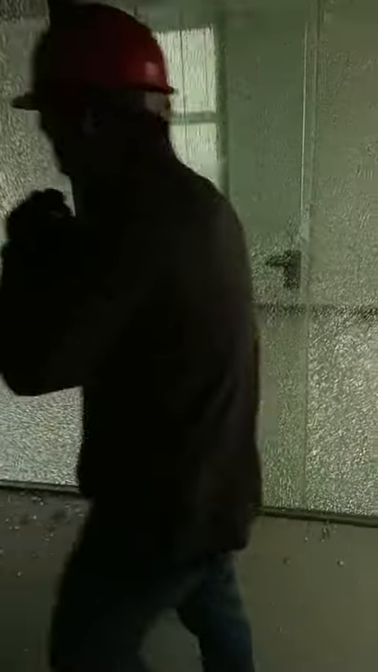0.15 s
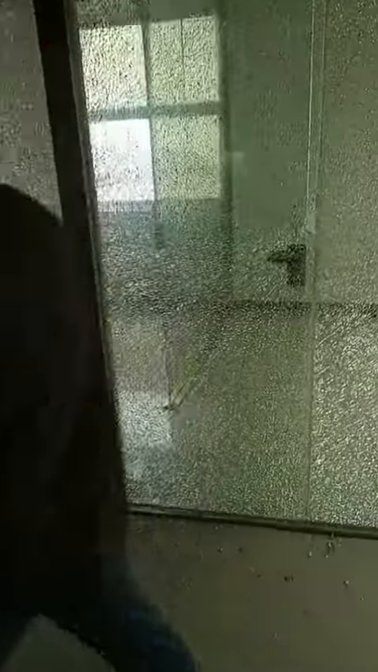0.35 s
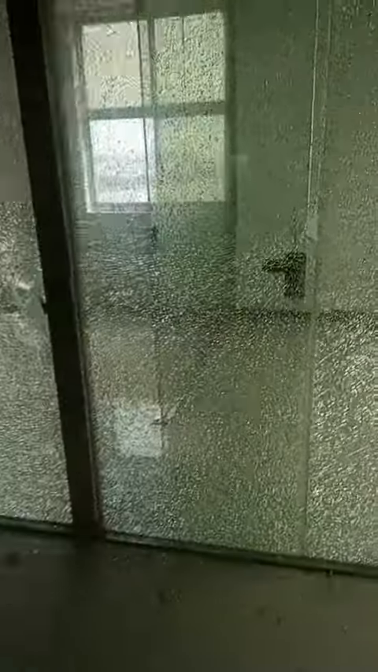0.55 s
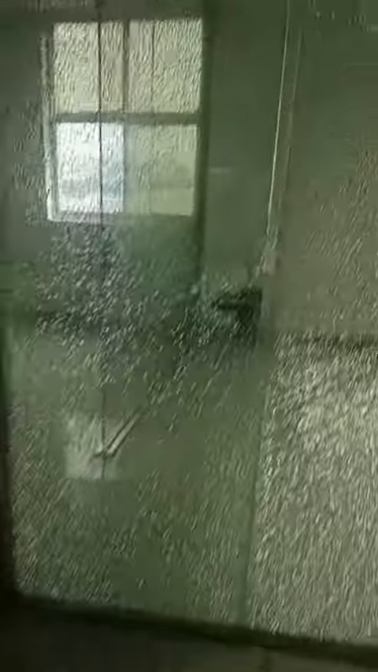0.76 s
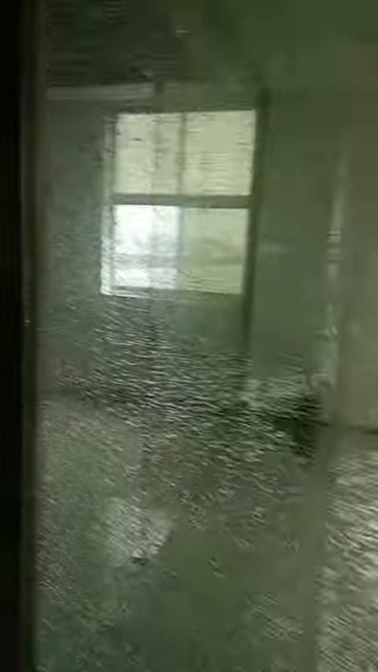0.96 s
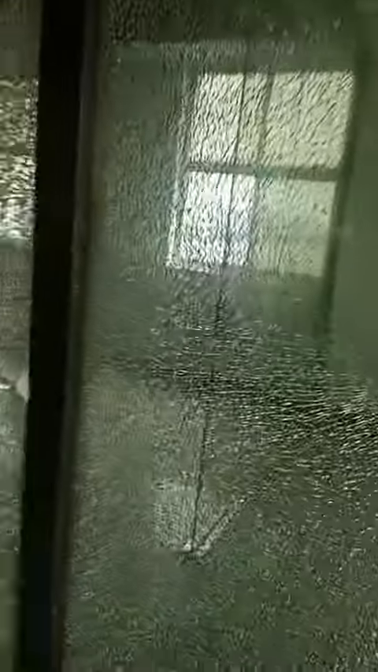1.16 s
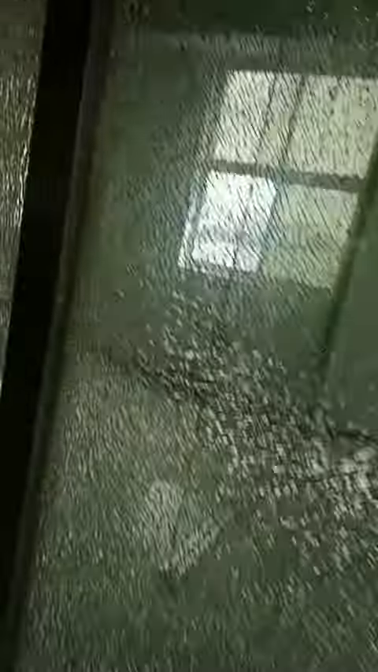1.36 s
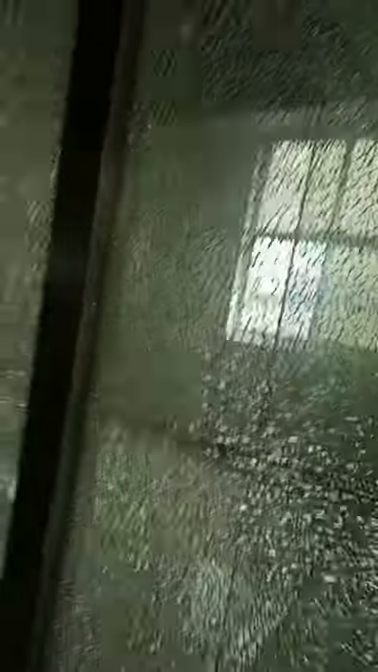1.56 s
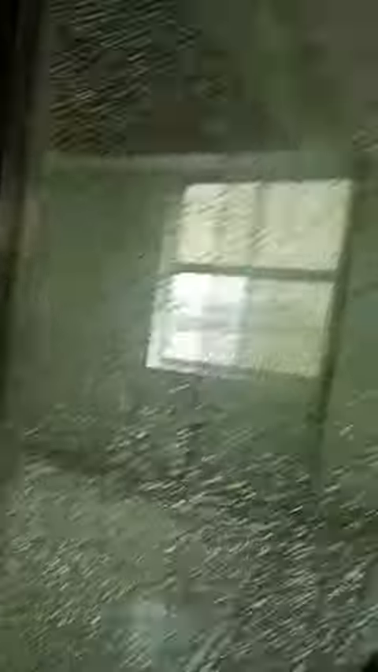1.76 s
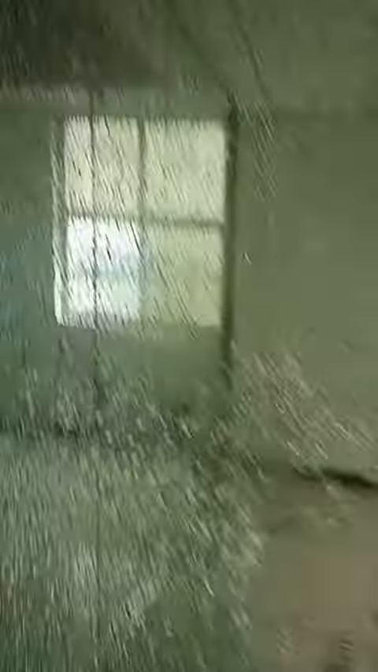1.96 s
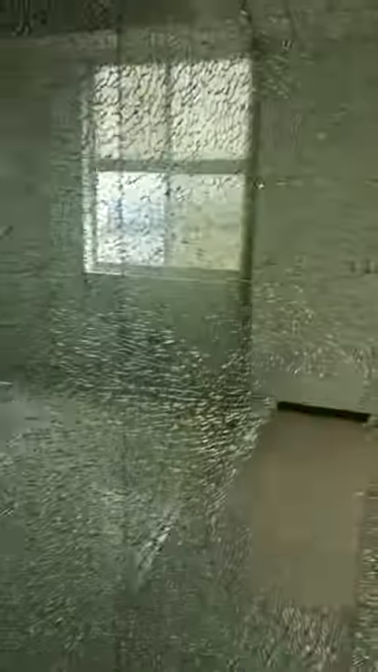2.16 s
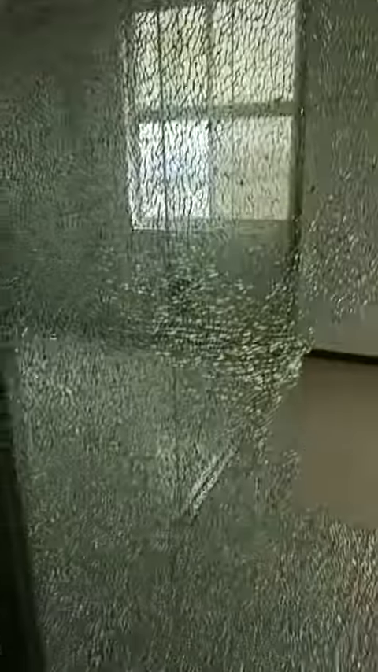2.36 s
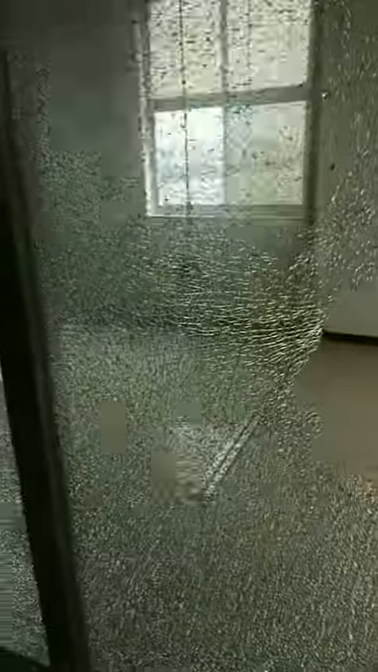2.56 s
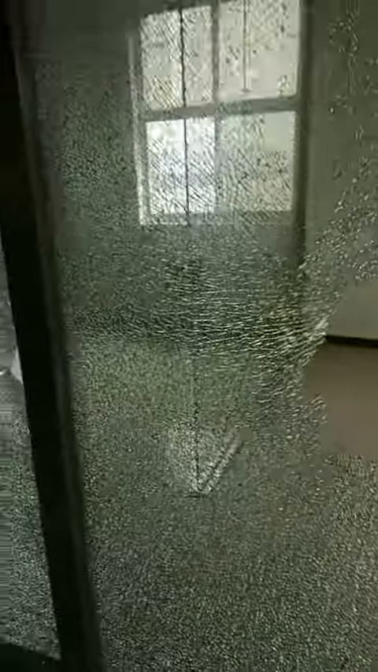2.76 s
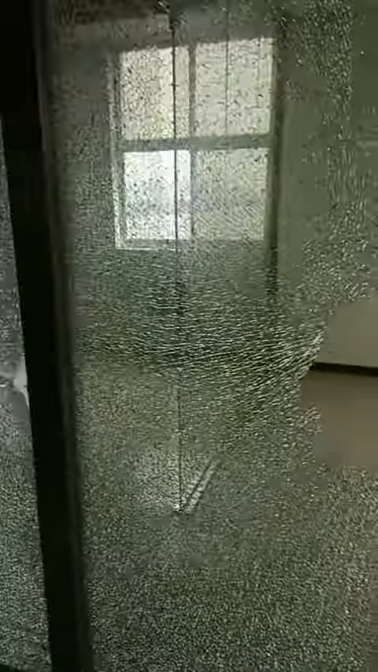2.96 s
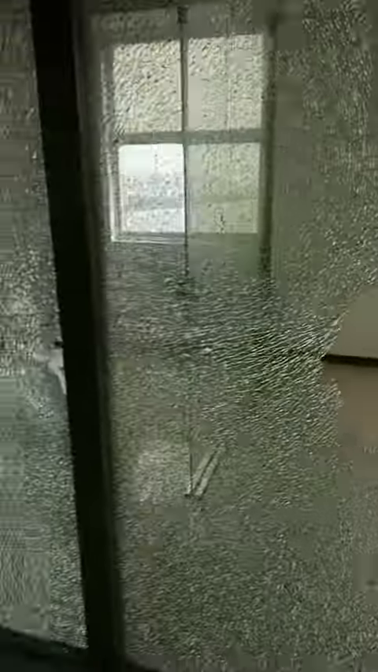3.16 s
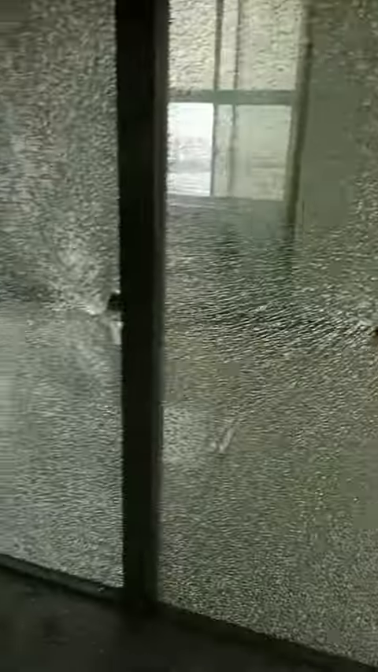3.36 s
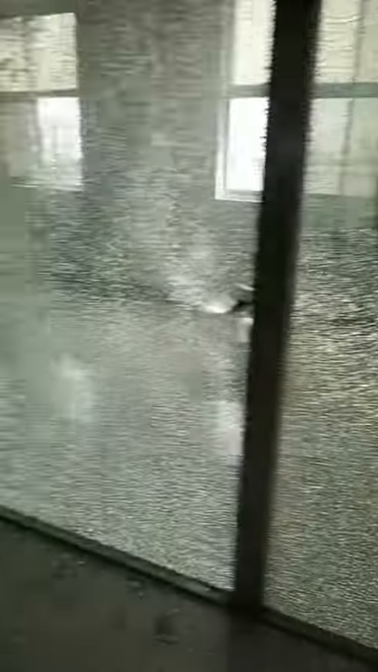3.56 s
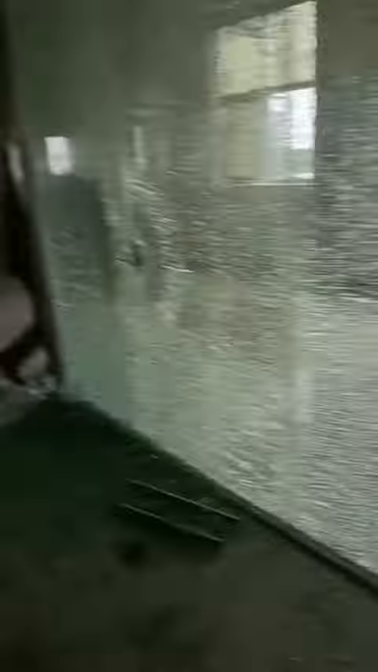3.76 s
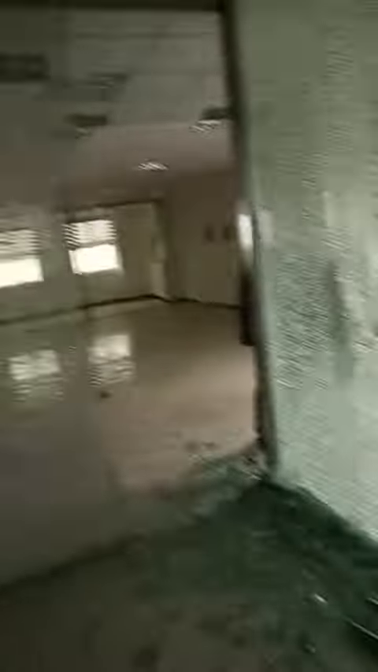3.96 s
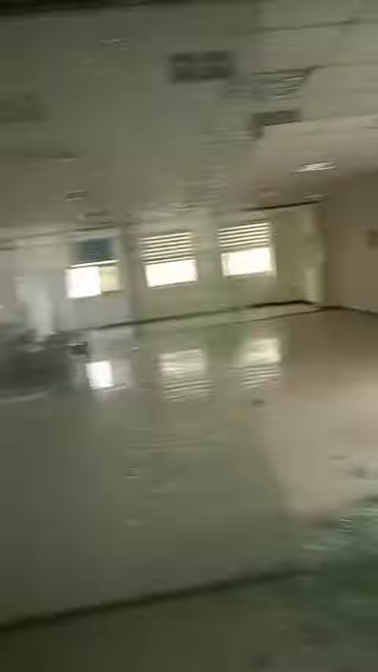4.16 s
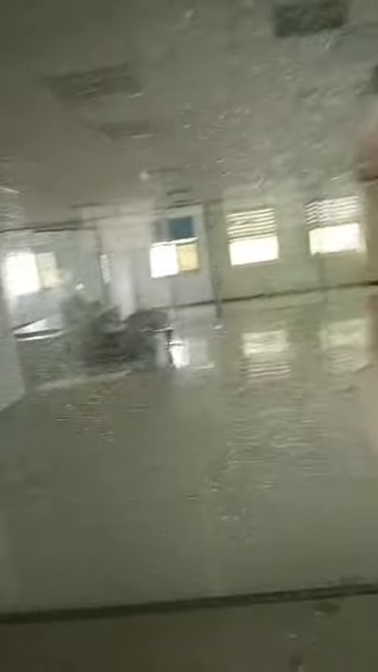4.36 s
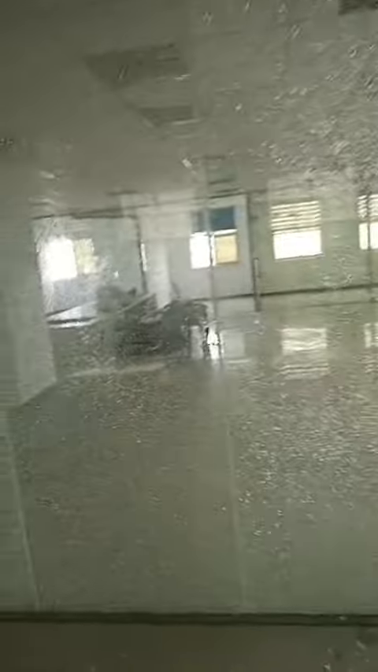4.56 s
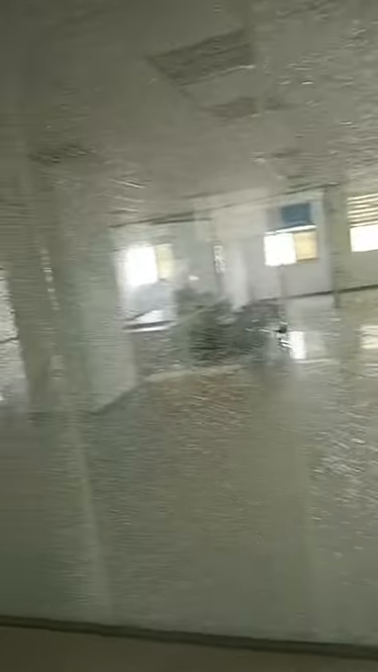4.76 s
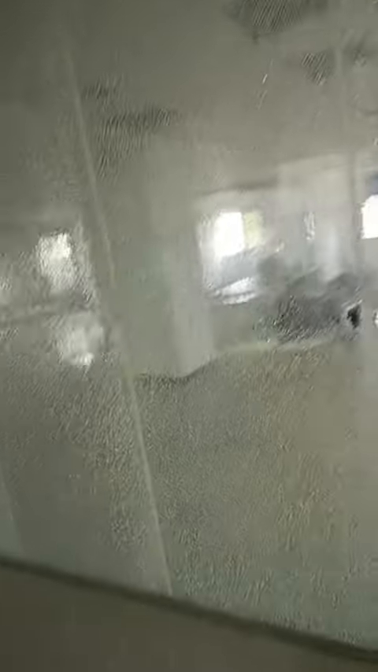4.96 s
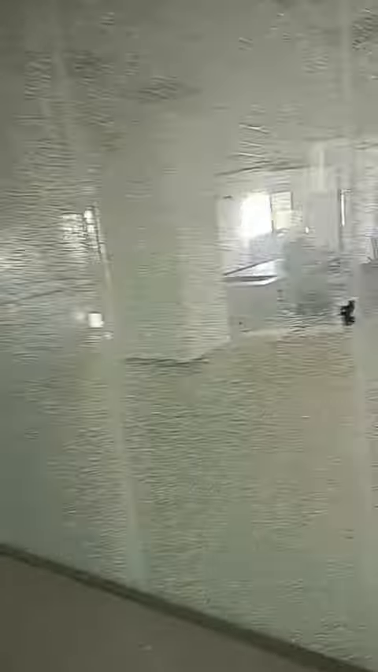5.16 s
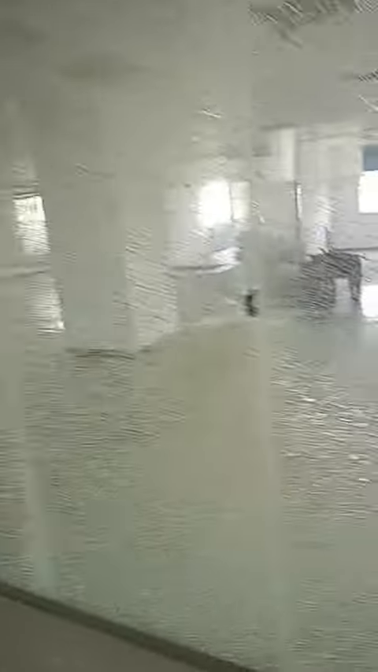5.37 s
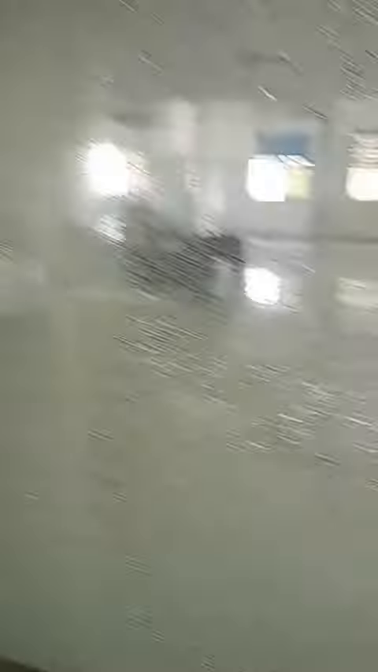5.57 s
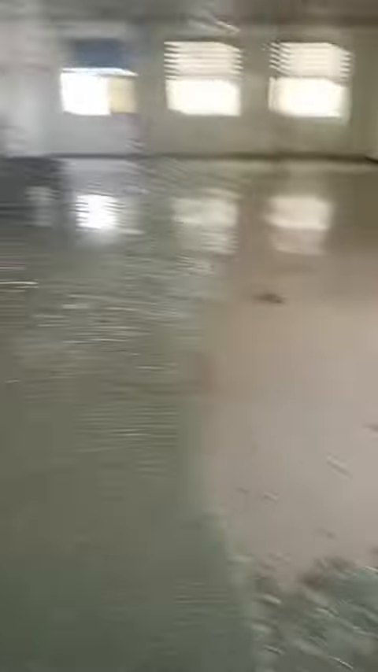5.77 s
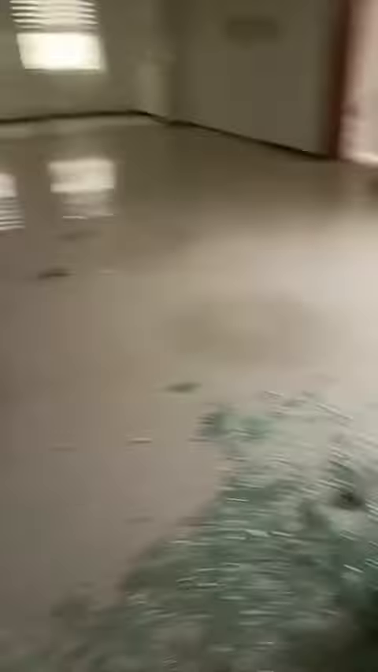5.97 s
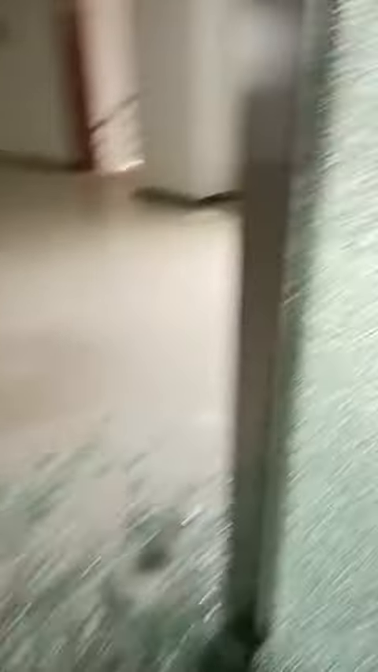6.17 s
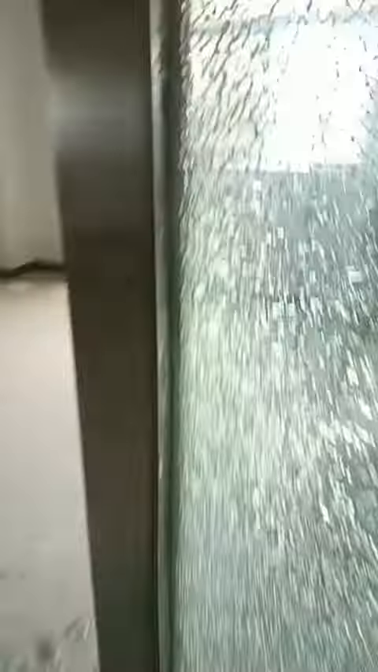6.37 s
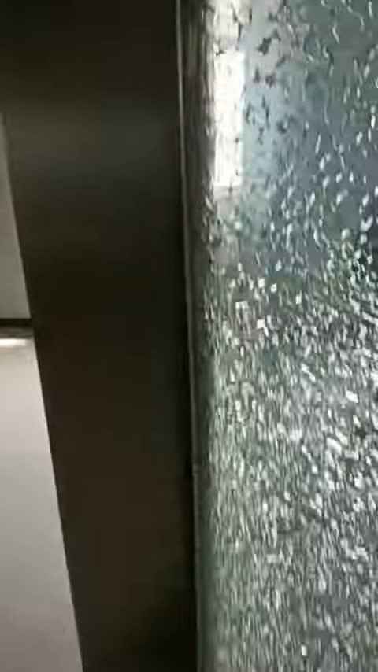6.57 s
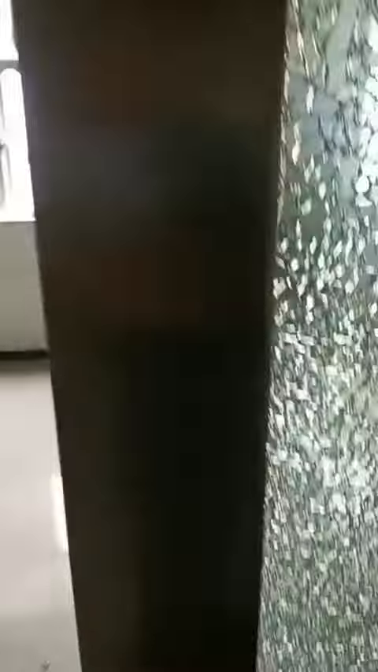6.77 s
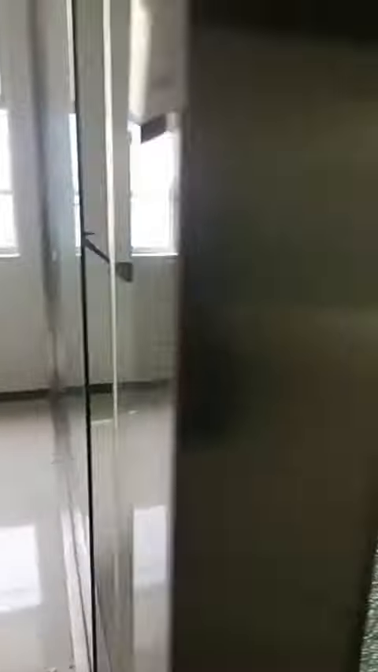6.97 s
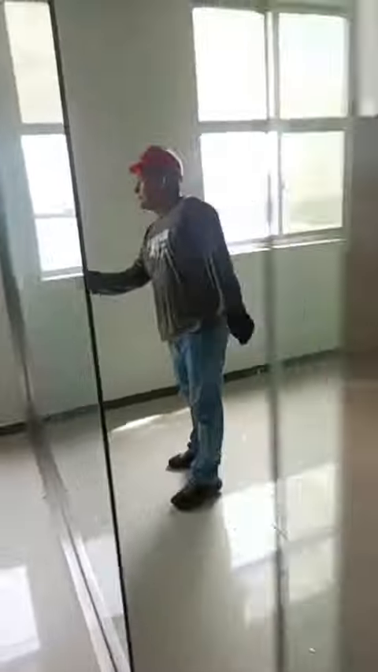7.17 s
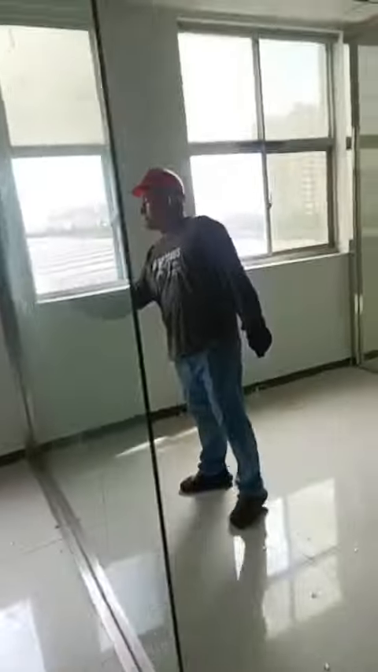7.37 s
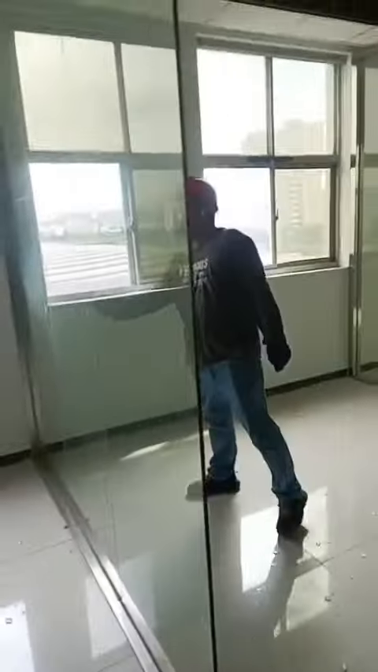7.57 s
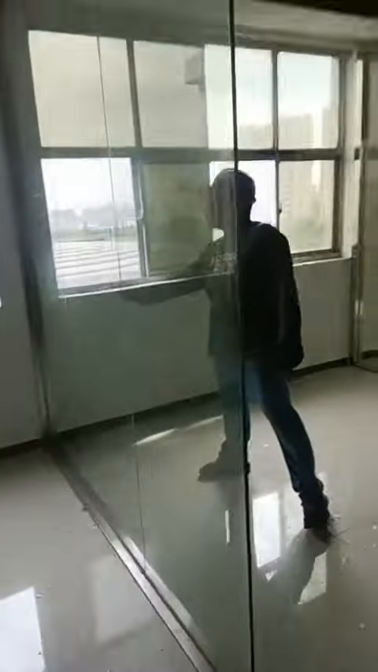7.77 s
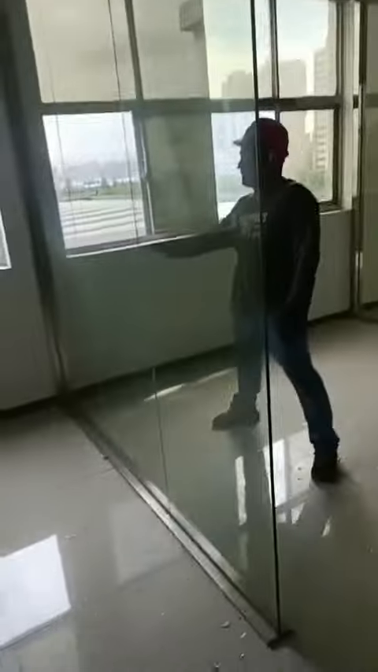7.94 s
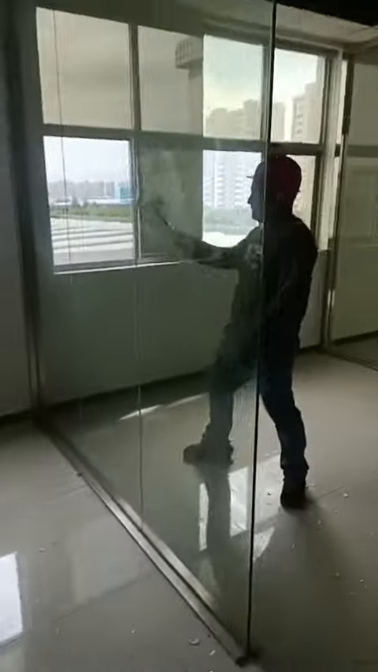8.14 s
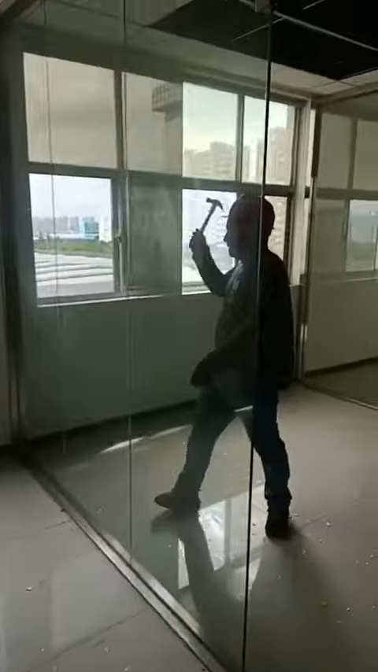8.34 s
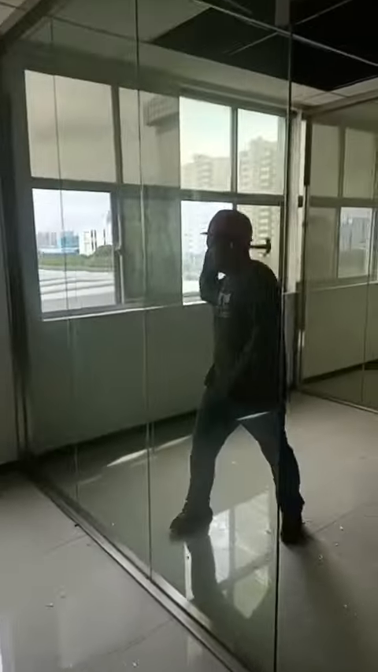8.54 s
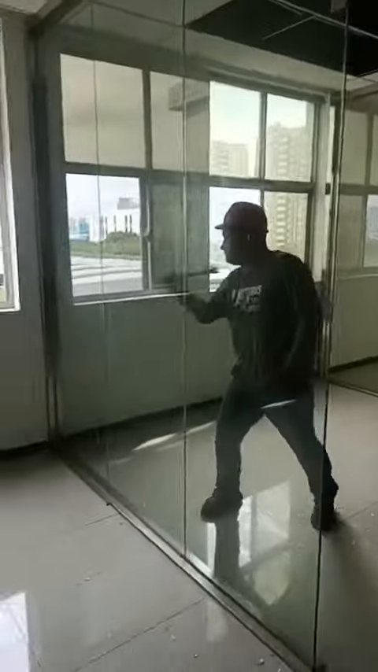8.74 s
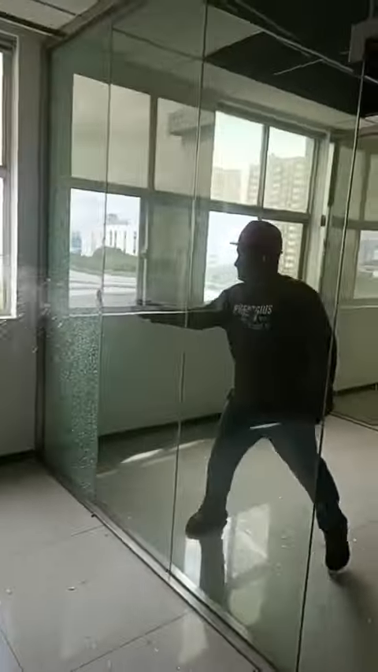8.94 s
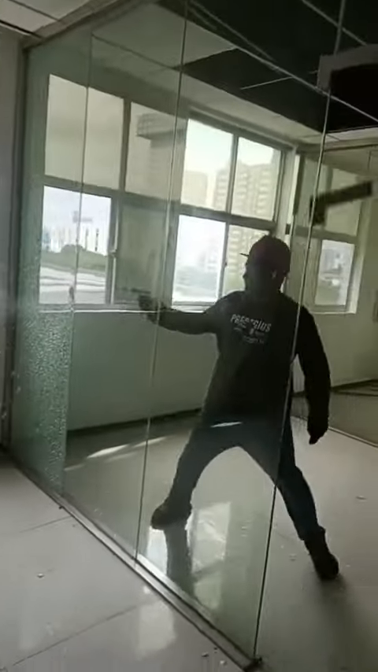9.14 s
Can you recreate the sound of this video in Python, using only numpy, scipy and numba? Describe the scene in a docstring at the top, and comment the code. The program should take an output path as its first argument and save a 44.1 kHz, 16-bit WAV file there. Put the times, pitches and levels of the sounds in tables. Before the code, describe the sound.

Small glass fragments patter down before a partition collapses, pouring shards over a hard floor with low thuds. After a brief scrape, loose glass crunches and single pieces clink more softly. Near the end, two hammer blows smash further panes, each with a ringing crash that echoes through the empty office, the second by far the loudest. A handheld phone picks it up in stereo from nearby.

```python
"""An empty office where toughened glass partitions break up, heard on a handheld two-microphone phone.
Shards of all sizes rain, slide and crunch on a hard floor, each impact a tiny damped ring. Single pieces
clink and one shard is dragged along. Two hammer blows burst further panes and ring through the rooms.
Underneath, a low rumble comes and goes over a faint hush."""
import sys
import numpy as np
from scipy import signal
from scipy.fft import rfft, irfft
from scipy.io import wavfile
from scipy.ndimage import uniform_filter1d
from numba import njit

SR = 44100
rng = np.random.default_rng(int(sys.argv[2]) if len(sys.argv) > 2 else 0)


def output_pcm(signal):
    """Save a mono or channel-first signal as 16-bit PCM at the path in sys.argv[1].

    Samples are clipped to [-1, 1] before scaling.
    """
    pcm = np.clip(np.atleast_2d(signal).T, -1, 1) * 32767
    wavfile.write(sys.argv[1], SR, np.round(pcm).astype(np.int16))


N = 405927
TIME = np.arange(N) / SR


def falling_glass():
    """Shards hit the floor: one shower per size, each riding its own envelope in random clumps."""
    # Shard sizes, heavy to fine: low_hz, high_hz, t60_s, longest_ring_ratio, impacts_per_s, scatter_db
    slab = (197, 730, 0.03, 0.59, 700, 2.4)
    chunk = (663, 1425, 0.008, 2.3, 1200, 1.1)
    lump = (1215, 2000, .014, 8, 1100, 2)
    piece = (2000, 4300, .022, 12, 1300, 1.8)
    crumb = (4200, 7500, .016, 14, 1000, 2.3)
    dust = (8600, 13200, 0.047, 2, 1500, 3.9)
    # Sparse, longer-ringing tones that give the shower a pitched shimmer: same columns
    shimmer = (1000, 6500, .06, 2.2, 350, 1.8)
    slabs, chunks, lumps, pieces, crumbs = (gain * flutter(20, depth_db=1.3) for gain in size_envelopes())
    heavy = slabs * shower(*slab) + chunks * shower(*chunk) + lumps * shower(*lump)
    fine = crumbs * (shower(*crumb) + undb(-15.5) * shower(*dust))
    medium = pieces * (shower(*piece) + undb(-2) * shower(*shimmer))
    return (heavy + medium + fine) * flutter(45, depth_db=.7)


def size_envelopes():
    """Gains of slabs, chunks, lumps, pieces and crumbs: falls, crunches and a trickle add in power."""
    # Panes coming down, one list each. Levels are for the mid-size pieces; the low edge is how far below
    # them the sound reaches: time_s, level_db, low_edge_oct, crumb_offset_db, heavy_boost_db
    falls = [
        [(0.0, -31.5, 1.95, -10.5, 2), (0.12, -32.5, 1.83, -3.5, 2.5), (0.22, -36, 1.47, -8, 4),
         (0.45, -35.5, 1.42, -5, 0), (0.62, -41, 1.5, -8, 4.5), (0.76, -44, 1.77, -6, -1.5),
         (0.8, -48, 0.36, 0, 1), (0.9, -42.5, 0.11, 2.5, 5)],
        [(1.347, -46.5, 0.19, -5, 14), (1.39, -36, 0.98, -17, 9), (1.43, -38, 1.85, -8, 5.4),
         (1.5, -31, 2.01, -7, 6.2), (1.55, -33, 1.9, -14, 9), (1.562, -68, 1.9, -18, 10.5)],
        [(1.571, -27.5, 1.5, -5, -6), (1.63, -22, 2, -4, 0.5), (1.9, -26, 2.09, -7, 0),
         (2.03, -27.5, 2.05, -4, 0.5), (2.07, -25.5, 2.05, -0.5, 1.5), (2.12, -26, 2.03, -3, -0.5),
         (2.3, -28, 1.924, -4, 3), (2.55, -23, 1.925, -8, 2.5), (2.78, -26.5, 1.967, -8, 6),
         (3.08, -25.5, 1.9, -5.5, 3), (3.25, -36, 1.82, -5, 4), (3.46, -44, 1.33, -6, 3.5),
         (3.6, -41.5, 1.17, -4.5, -1), (3.75, -42, 1.36, -4.5, 8.5), (3.98, -49.5, 0.53, -3.5, 8.5),
         (4.08, -67, 0.41, -5, 18), (4.22, -59.5, 0.42, 15, 8)],
        [(7.353, -50, 0.9, -20, 0), (7.37, -37, 0.59, -35, -3), (7.5, -32.5, 1, -35, -3),
         (7.6, -40.5, 1, -17, -6), (7.75, -50, 1.3, -1, 9), (7.9, -58, 1, -8, 14)],
        [(8.868, -31, 0.61, -6, -3), (8.885, -17, 0.7, -2, -9), (8.97, -22, 0.45, -6.5, -8),
         (9.05, -27.5, .8, -21, 0), (9.12, -32, 1.97, -24, 4.5), (9.21, -27.5, 2.06, -14, 14)],
    ]
    # Crunches and small slides: start_s, level_db, rise_s, hold_s, t60_s, low_edge_oct, crumb_offset_db
    crunches = [(0.895, -36, 0.028, 0.039, 0.91, 1.25, -5.5), (1.07, -45, 0.048, 0.066, 0.36, 0.64, -20),
                (2.155, -22.5, 0.036, 0.14, 0.44, 0.12, -11), (4.217, -39, 0.094, 0.12, 0.26, 0.45, -4),
                (4.552, -56, 0.02, 0.18, 0.43, 0.19, -5), (4.89, -54.5, 0.11, 0.33, 0.59, 0.094, 3.5),
                (5.203, -37.5, 0.012, 0.051, 0.79, 0.35, -3.5), (5.374, -34.5, 0.0035, 0.022, 0.86, 1.3, 1),
                (5.52, -40, 0.08, 0.27, 0.34, 0.84, -2.5), (5.934, -42.5, 0.085, 0.071, 0.69, 0.46, 1),
                (6.071, -36, 0.053, 0.029, 0.47, 1.33, -4), (6.226, -38, 0.01, 0.078, 0.25, 0.66, -7),
                (6.259, -36.5, 0.012, 0.036, 0.35, 0.52, -11),
                (6.384, -40.5, 0.0026, 0.1, 0.36, 0.49, -4.5),
                (6.523, -41.5, 0.022, 0.031, 0.32, 0.61, -0.5),
                (6.606, -35.5, 0.037, 0.04, 0.14, 0.74, 1.5), (6.649, -34, 0.03, 0.033, 0.17, 1.3, -0.5),
                (6.735, -42.5, 0.022, 0.038, 0.5, 0.57, -3), (6.897, -49.5, 0.0036, 0, 0.215, 0.2, 7.5),
                (6.923, -46.5, 0.019, 0.025, 0.36, 0.63, -5), (7.066, -33.5, 0.032, 0.033, 0.67, 2.05, 1),
                (7.124, -35, 0.052, 0.12, 0.27, 1.39, -2), (7.47, -55, 0.22, 0.16, 0.6, .1, 4),
                (7.772, -40.5, 0.059, 0.035, 0.13, 1.95, -5), (7.989, -52.5, 0.021, 0, 0.6, 0.63, -6),
                (8.29, -52.5, 0.0058, 0, 0.097, 0.23, 8), (8.315, -45, 0.019, 0.053, 0.34, 0.58, -5.5),
                (8.622, -49, 0.021, 0.054, 0.85, 0.095, -0.5)]
    # Stray crumbs: time_s, level_db
    trickle = [(0.0, -71), (1.3, -50.5), (4.05, -53.5), (4.7, -47.5), (4.85, -58), (5.15, -56), (7.3, -49),
               (7.4, -76), (8.1, -56.5), (8.22, -78), (8.5, -54), (9.2, -95)]
    spills = [(swell_db(*row[:5]), *row[5:], 0) for row in crunches]
    for fall in falls:
        time_s, level_db, *size_mix = np.transpose(fall)
        envelope_db = np.interp(TIME, time_s, level_db, left=-200, right=-200)
        spills.append((envelope_db, *(np.interp(TIME, time_s, column) for column in size_mix)))
    power = np.zeros((5, N))
    power[4] = undb(2 * np.interp(TIME, *np.transpose(trickle)))
    for level_db, low_edge_oct, crumb_db, boost_db in spills:
        offsets_db = [band_db + boost_db for band_db in low_bands_db(low_edge_oct)] + [0, crumb_db]
        audible = level_db > -110
        for size_power, offset_db in zip(power, offsets_db):
            size_power[audible] += undb(2 * (level_db + offset_db)[audible])
    return np.sqrt(power)


def low_bands_db(low_edge_oct):
    """Levels of the three low bands against the pieces: bands below the low edge fade fast."""
    fade_db_per_oct, floor_db = 50.5, -29.5
    return [np.maximum(full_db - fade_db_per_oct * np.maximum(band_oct - low_edge_oct, 0), floor_db)
            for band_oct, full_db in [(2.146, -2), (1.522, -3.5), (.61, -5)]]


def shower(low_hz, high_hz, t60_s, longest_ring_ratio, impacts_per_s, scatter_db):
    """Dense random impacts of one shard size: most land dead, a few ring on."""
    # Tone of the showers as the phone hears them, dipping near 5 kHz: pitch_hz, gain_db
    mic_colour = [(300, -5), (450, -6), (620, 1), (4400, 6), (5000, -1.5), (5600, 3.5), (6400, -1),
                  (7200, -3), (8000, 6.5), (10000, 11), (13000, 5)]
    draws = rng.random((int(5000 * N / SR), 5))
    when, pitch, ring, size, place = draws[:int(impacts_per_s * N / SR)].T
    hz = low_hz * (high_hz / low_hz) ** pitch
    stretch = longest_ring_ratio ** (ring ** 4)
    gain = undb(on_log(hz, mic_colour) - scatter_db * np.log(1.01 - size)) / stretch ** .074
    pan = np.pi / 4 + np.pi * (place - .5) * min(low_hz / 900, .7)  # heavy sizes stay near the centre
    start = (when * N).astype(np.int64)
    impacts = rings(start, hz, t60_s * stretch, gain * np.cos(pan), gain * np.sin(pan))
    return unit(band(impacts, 1.058 * low_hz, 1.32 * high_hz))


def hammer_blows():
    """Each blow bursts a pane: a crack roars off through the rooms while the glass rings."""
    # Blows: start_s, level_db, tilt_db_per_oct, pan_left_db, hold_s, decay_ratio, thump_db, crack_db
    blows = [(7.352, -20, -2, 1, 0.19, 0.86, -8.5, 10), (8.868, -8.5, 1.5, 0.5, 0.038, 1, 6, -1.5)]
    return burst(blows) + pane_ring(blows)


def burst(blows):
    """Third-octave noise bands crack and ring through the rooms, fading ever faster as if gated."""
    # Spectrum of the burst: frequency_hz, density_db
    burst_colour = [(24, -56), (40, -4.5), (264, 4), (350, 1.5), (753, 0.5), (1030, 8.5), (1190, 6.5),
                    (3550, -5), (5000, -31), (6000, -35), (7300, -27.5), (8300, -66), (10000, -44),
                    (15600, -65), (22000, -120)]
    # Base decay of the rooms: frequency_hz, t60_s
    room_decay = [(60, 3.8), (250, 1.16), (600, 1.01), (1100, 1.82), (2500, 1.3), (5000, 0.23),
                  (12000, 0.44)]
    bend_db, crack_s = 44, .0057
    first = int(blows[0][0] * SR)
    centres_hz = 40 * 2 ** (np.arange(26) / 3)
    bands_db = on_log(centres_hz, burst_colour) + 10 * np.log10(centres_hz)
    shares_db = bands_db - 10 * np.log10(np.sum(10 ** (bands_db / 10)))
    out = np.zeros((2, N))
    for hz, share_db in zip(centres_hz, shares_db):
        width = min(.061 + hz / 1300, 1)
        roar = unit(band(wide_noise(width, first), hz / 1.088, hz * 1.177, order=2))
        for start_s, level_db, tilt, pan_db, hold_s, decay_ratio, thump_db, crack_db in blows:
            start = int(start_s * SR)
            t = TIME[:N - start]
            age = np.maximum(t - hold_s, 0) / decay_ratio
            decay_db = -60 * age / on_log(hz, room_decay) - bend_db * age ** 2
            shape_db = decay_db + crack_db * np.exp(-t / crack_s)
            attack = 1 - np.exp(-t / (.0004 + .83 / hz))  # lows take longer to build
            tone_db = tilt * np.log2(hz / 1000) + thump_db / (1 + (hz / 200) ** 2)
            envelope = attack * undb(level_db + share_db + tone_db + shape_db)
            balance = undb([[pan_db / 2], [-pan_db / 2]])
            out[:, start:] += roar[:, start - first:] * envelope * balance
    return out


def pane_ring(blows):
    """The struck pane's modes, each split into nine close partials that beat."""
    # Pane modes: pitch_hz, relative_db, nominal_t60_s
    modes = [(634, -8.5, 1.26), (849, -5.5, 0.51), (894, -11.5, 0.66), (936, -4, 0.24), (1025, -2, 1.27),
             (1148, -2.5, 0.67), (1266, -8, 0.9), (1342, -4.5, 0.42), (1560, -5.5, 3), (2000, -13.5, 0.54),
             (2160, -19, 0.65), (2550, -12, 0.87), (2850, -13.5, .8), (3100, -18, 0.6), (3420, -15, 1.1),
             (3760, -15, 0.79), (4300, -24.5, 0.57), (5560, -19, 0.5), (6220, -22.5, 0.48),
             (7500, -25.5, 0.63)]
    hz, mode_db, t60_s = np.repeat(modes, 9, axis=0).T
    out = np.zeros((2, N))
    for start_s, level_db, tilt, *_ in blows:
        gain = undb(level_db - 5 + mode_db - mode_db.max() + tilt * np.log2(hz / 1000))
        split, late = rng.standard_normal((len(hz), 2)).T
        delay_s = .006 * (1 + late ** 2) * 1000 / hz  # low modes speak later
        partial_hz = hz * (1 + .011 * np.sqrt(hz / 1000) * split)
        ring_s = np.clip(t60_s, .02, .9) * 2 ** (-.4 * np.abs(split))
        angle = 2 * np.pi * rng.random(len(hz))  # each partial reaches the two microphones differently
        left, right = gain * np.cos(angle), gain * np.sin(angle)
        out += rings(samples(start_s + delay_s), partial_hz, ring_s, left, right)
    return out


def clinks(partials=30, snap_scatter_s=.00028, ring_scatter_s=.002, snap_t60_s=.004):
    """Single pieces land or break: a dry snap, then splinters ring around the pitch, some late."""
    # Pieces, with levels per partial: start_s, pitch_hz, spread_oct, nominal_t60_s, ring_db, snap_db
    hits = [(.1204, 1960, 0.46, .01, -48, -39), (.5417, 1570, 0.31, 0.036, -40, -43),
            (.946, 2690, 0.15, 0.11, -40, -43), (1.345, 3570, 0.4, 0.027, -44, -56),
            (1.372, 1780, 0.29, 0.043, -53, -50), (1.39, 1140, 0.12, 0.049, -27.5, -48),
            (1.458, 1580, 0.36, .02, -54, -37), (1.574, 1255, 0.44, 0.018, -18, -25),
            (2.14, 1650, 0.14, 0.038, -23, -42), (2.188, 2300, 0.21, 0.084, -26.5, -34),
            (2.243, 1830, 0.068, .04, -26, -45), (2.297, 2356, 0.12, 0.12, -27, -40),
            (2.333, 2140, 0.054, 0.029, -20, -40), (2.39, 2497, 0.044, 0.12, -28, -40),
            (2.485, 2670, 0.065, 0.054, -29.5, -42), (2.548, 2600, 0.06, .05, -39, -42),
            (2.448, 2520, 0.084, 0.035, -30, -33), (2.982, 1410, 0.34, .02, -43, -44),
            (3.738, 1290, 0.27, 0.065, -41, -58), (4.222, 5130, 0.36, 0.023, -42.5, -40),
            (4.287, 3030, 0.34, 0.031, -44, -59.5), (5.218, 5620, 0.16, 0.04, -39.5, -42.5),
            (5.227, 2780, 0.29, 0.027, -34.5, -45), (5.377, 2560, 0.91, 0.038, -33, -46),
            (5.388, 3070, 0.81, 0.022, -39, -33), (5.396, 6400, 0.12, 0.015, -47, -44),
            (5.483, 3820, 0.32, 0.026, -36.5, -38), (5.951, 5150, 0.41, 0.052, -47, -45),
            (6.021, 2530, 0.51, 0.029, -53, -56), (6.111, 4690, 0.58, 0.041, -36.5, -48),
            (6.236, 2670, 0.2, .02, -43, -38), (6.281, 3960, 0.39, 0.017, -34.5, -37),
            (6.296, 3650, 0.36, 0.019, -53, -42), (6.388, 3910, 0.094, 0.04, -38.5, -28.5),
            (6.394, 4000, 0.24, .02, -42, -37), (6.403, 4230, 0.29, 0.041, -44, -42),
            (6.418, 4140, .15, 0.027, -46, -37), (6.344, 3700, 0.25, 0.0071, -45, -46),
            (6.518, 4420, 0.31, 0.038, -41, -41), (6.635, 4330, 0.25, .02, -56, -48),
            (6.68, 4060, 0.28, 0.027, -40, -42), (6.694, 3760, 0.54, .03, -40, -38),
            (6.712, 2450, .4, 0.026, -49, -37), (6.889, 4500, 0.32, 0.011, -42, -40),
            (6.952, 4400, 0.25, 0.03, -43, -53), (6.968, 4230, 0.49, .02, -49, -46),
            (7.085, 4380, 0.45, 0.061, -36.5, -52), (7.096, 4190, 0.63, 0.11, -32.5, -38),
            (7.117, 3800, 0.69, .04, -36, -26), (7.16, 3430, 0.35, 0.025, -41, -36),
            (7.355, 1300, .12, 0.0084, -13.5, -30), (7.44, 1300, 0.25, .015, -39, -40),
            (7.52, 1400, .2, .03, -33, -45), (8.291, 3280, 0.21, 0.014, -65, -57.5),
            (8.329, 3400, 0.16, 0.01, -39, -34.5), (8.378, 1700, 0.31, .02, -52, -48),
            (8.398, 1690, .3, 0.019, -55, -47.5), (8.621, 3220, 0.25, .012, -59, -55),
            (8.638, 3270, 0.054, 0.014, -34, -29), (8.659, 3570, 0.26, 0.019, -49, -44),
            (8.710, 1630, 0.17, 0.037, -52, -62), (8.824, 5600, 0.49, 0.02, -49, -52.5)]
    start_s, pitch_hz, spread_oct, t60_s, ring_db, snap_db = np.repeat(hits, partials, axis=0).T
    late, detune, mid, side = rng.standard_normal((len(start_s), 4)).T
    snap_start = samples(start_s) + samples(snap_scatter_s * np.abs(late))
    snap_hz = np.clip(pitch_hz * 2 ** (.5 * detune + .2), 900, 11000)
    left = undb(snap_db) * np.sign(mid)
    right = left * (.5 + .14 * side)
    snap = rings(snap_start, snap_hz, np.full(len(start_s), snap_t60_s), left, right)
    ring_start = samples(start_s) + samples(ring_scatter_s * np.abs(late) ** 3)
    ring_hz = np.clip(pitch_hz * 2 ** (spread_oct * detune), 900, 8000)
    ring_gains = undb(ring_db) * np.array([mid + side / 2, mid - side / 2])
    ring = rings(ring_start, ring_hz, np.clip(t60_s, .003, .1), *ring_gains)
    return band(snap + ring, 1200, 15000, order=3)


def scrape(catches=500, t60_s=.11, spread_oct=.145, trim_db=-8):
    """A dragged shard catches on the floor, each catch a short ring near a gliding pitch."""
    # Course of the drag: time_s, pitch_hz, level_db
    drag = [(3.55, 1290, -40.5), (3.59, 1324, -47), (3.66, 1437, -39.5), (3.742, 1325, -39),
            (3.794, 1499, -46), (3.92, 1734, -47.5), (4.054, 1730, -56), (4.1, 1590, -86)]
    time_s, pitch_hz, level_db = np.transpose(drag)
    when, size = rng.random((catches, 2)).T
    detune, side = rng.standard_normal((catches, 2)).T
    start_s = time_s[0] + (time_s[-1] - time_s[0]) * when
    gain = undb(np.interp(start_s, time_s, level_db) + trim_db - 1.7 * np.log(1.01 - size))
    hz = np.interp(start_s, time_s, pitch_hz) * 2 ** (spread_oct * detune)
    left, right = gain * (1 + .86 * side), gain * (1 - .27 * side)
    return rings(samples(start_s), hz, np.full(catches, t60_s), left, right)


def rumble():
    """Low thuds and deeper gusts: fluttering swells of noise, mostly alike on both microphones."""
    # Thuds and gusts: start_s, level_db, rise_s, hold_s, t60_s
    thuds = [(0.0, -36, 0.00084, 0.0055, 0.3), (.08, -53, 0.026, 0.084, 0.17), (.35, -72, 0.044, 0, .4),
             (1.407, -40.5, 0.015, 0.061, 0.3), (1.569, -21, 0.016, 0, 0.16), (1.587, -25, 0.025, 0.5, .5),
             (2.071, -25, 0.0087, 0.023, 0.08), (2.14, -46.5, 0.017, 0.17, 0.25),
             (2.36, -42, 0.069, 0.099, 0.45), (2.495, -44, 0.084, 0.031, .7), (2.704, -42, 0.023, 0, .8),
             (2.903, -56, 0.03, 0.24, 0.27), (3.976, -68.5, 0.033, 0.46, .3), (5.14, -56, 0.038, 0, 0.16),
             (5.4, -70, 0.055, 0.026, .15), (5.557, -50, 0.076, 0.025, 0.23),
             (6.048, -64, 0.072, 0.0077, 1), (7.08, -56, 0.017, 0.018, 0.41), (8.281, -59, 0.023, 0, 0.36)]
    gusts = [(0.0, -56, .001, 0, .3), (0.118, -49, 0.036, 0.011, .15), (.35, -70, 0.055, 0.013, .3),
             (1.26, -55, 0.051, 0, 0.3), (1.57, -27, 0.028, 0, 0.56), (1.87, -38, 0.03, 0.09, .4),
             (2.07, -36, 0.034, 0.016, 0.17), (2.4, -66, .1, .25, .4), (3.0, -71, .05, .05, .15),
             (3.95, -51.5, 0.028, 0.274, 0.16), (5.39, -48, 0.051, 0, 0.32),
             (5.52, -46.5, 0.072, 0.23, 0.11), (6.064, -60, 0.087, 0.1, .6)]
    out = 0
    for low_hz, high_hz, swells, idle_db in [(94.5, 272, thuds, -77.5), (49, 93, gusts, -87)]:
        envelope = np.sqrt(undb(2 * idle_db) + sum(undb(2 * swell_db(*row)) for row in swells))
        noise = unit(band(wide_noise(width=.5), low_hz, high_hz, order=2))
        out = out + noise * envelope * flutter(30, depth_db=2.5)
    return out


def hush(level_db=-56.5):
    """A faint, steady bed of coloured noise."""
    # Spectrum of the hush: frequency_hz, density_db
    hush_colour = [(18, -69.5), (30, -10.5), (991, -13), (1530, 1), (2140, -39.5), (4400, -6.5),
                   (5010, -27), (5550, -17.5), (6640, -1), (14000, -30.5)]
    hz = np.maximum(np.arange(N // 2 + 1) * SR / N, 1)
    spectrum = rfft(rng.standard_normal((2, N))) * undb(on_log(hz, hush_colour))
    return undb(level_db) * unit(irfft(spectrum, N))


def near_walls(x, echo_db, t60_s=.23):
    """Direct sound plus a short diffuse tail off the walls, different at each microphone."""
    t = TIME[:SR // 2]
    tail = rng.standard_normal((2, len(t))) * undb(-60 * t / t60_s) * (t > .002)
    tail = tail / np.sqrt(np.sum(tail ** 2, axis=1, keepdims=True))
    return x + undb(echo_db) * signal.fftconvolve(x, tail, axes=1)[:, :N]


def phone_turning(x):
    """As the phone turns, sound reaches the left microphone later or earlier than the right."""
    # Delay between the microphones: time_s, left_lag_ms
    left_lag = [(0.3, .45), (.7, -.35), (1.7, -.3), (2.1, .4), (2.9, .4), (3.3, .05), (4.7, -.15),
                (5.2, -.46), (9.2, -.46)]
    lag = np.round(np.interp(TIME, *np.transpose(left_lag)) * SR / 1000).astype(np.int64)
    return np.array([x[0, np.clip(np.arange(N) - lag, 0, N - 1)], x[1]])


@njit
def rings(start, hz, t60_s, left, right):
    """Stereo sum of damped sines, each running from its start sample until it is 60 dB down."""
    out = np.zeros((2, N))
    for k in range(len(start)):
        step = np.exp((2j * np.pi * hz[k] - np.log(1000) / t60_s[k]) / SR)
        phasor = 1 + 0j
        for i in range(start[k], min(N, start[k] + int(t60_s[k] * SR))):
            phasor *= step
            out[0, i] += left[k] * phasor.imag
            out[1, i] += right[k] * phasor.imag
    return out


def swell_db(start_s, level_db, rise_s, hold_s, t60_s, sag_db_per_s=25):
    """Envelope with a rise, a sagging hold and a fade."""
    t, rise_s = TIME - start_s, max(rise_s, .001)
    held_s = np.clip(t - rise_s, 0, max(hold_s, 0))
    fading_s = np.maximum(t - rise_s - held_s, 0)
    rise_db = 20 * np.log10(np.clip(t / rise_s, 1e-6, 1))
    return level_db + rise_db - sag_db_per_s * held_s - 60 * fading_s / max(t60_s, .02)


def flutter(rate_hz, depth_db):
    """A gain that glides between random levels."""
    hold = SR // rate_hz
    steps = np.repeat(rng.standard_normal(N // hold + 1), hold)
    return undb(depth_db * uniform_filter1d(steps, hold)[:N])


def wide_noise(width, first=0):
    """Stereo noise from sample first on, its sides alike (width 0) to unrelated (1)."""
    mid, side = rng.standard_normal((2, N - first))
    return mid + width * side * np.array([[1], [-1]])


def band(x, low_hz, high_hz, order=4):
    return signal.sosfilt(signal.butter(order, [low_hz, high_hz], "bandpass", fs=SR, output="sos"), x)


def on_log(hz, table):
    """Read a (frequency_hz, value) curve along a log-frequency axis."""
    points_hz, values = np.transpose(table)
    return np.interp(np.log(hz), np.log(points_hz), values)


def samples(seconds):
    return (seconds * SR).astype(np.int64)


def undb(db):
    return 10 ** (np.asarray(db) / 20)


def unit(x):
    return x / np.sqrt(np.mean(x ** 2))


def scene():
    """Loose glass between near walls, with hammer blows, rumble and hush mixed in."""
    debris = near_walls(falling_glass() + scrape(), echo_db=-6)
    single_pieces = near_walls(clinks(), echo_db=-12)
    return phone_turning(debris + single_pieces) + hammer_blows() + rumble() + hush()


def record(dry):
    """The phone thins the deepest bass, clips the loudest blow and cuts the top."""
    low_cut = signal.butter(2, 54.7, "highpass", fs=SR, output="sos")
    high_cut = signal.ellip(8, .2, 70, 14800, fs=SR, output="sos")
    clipped = np.clip(signal.sosfilt(low_cut, dry), -.97, .97)
    return signal.sosfilt(high_cut, clipped)


dry = scene()
out = record(dry)
output_pcm(out)
```